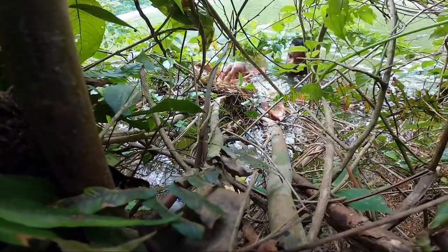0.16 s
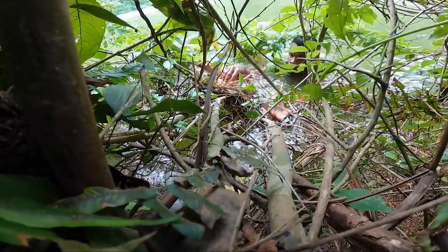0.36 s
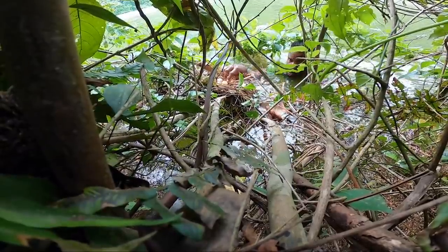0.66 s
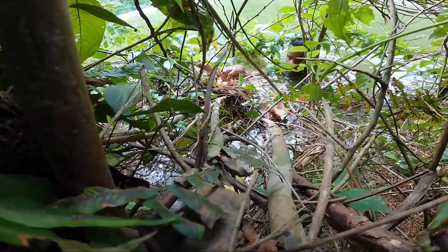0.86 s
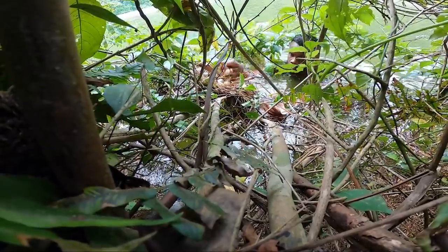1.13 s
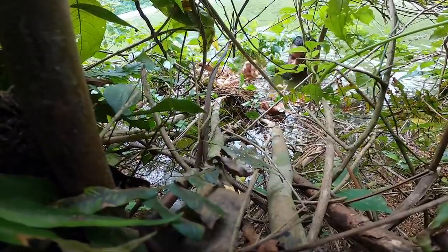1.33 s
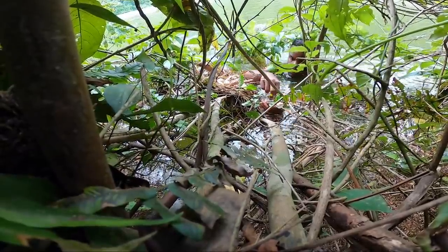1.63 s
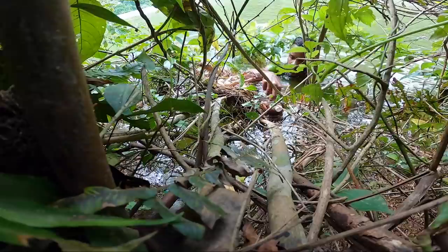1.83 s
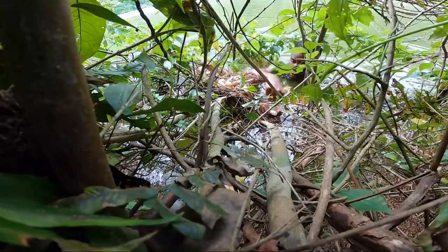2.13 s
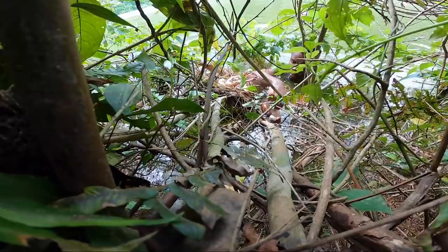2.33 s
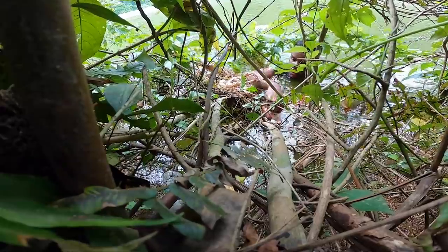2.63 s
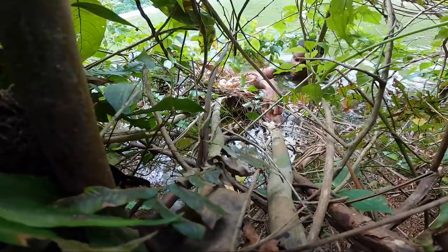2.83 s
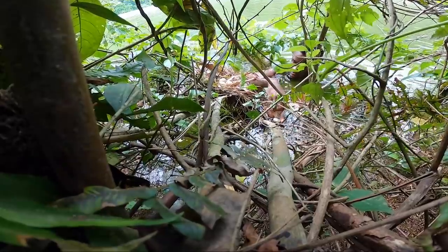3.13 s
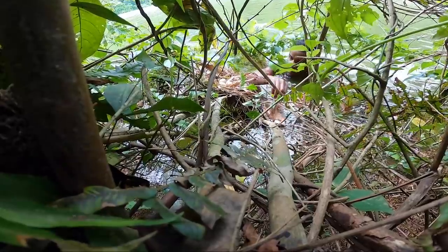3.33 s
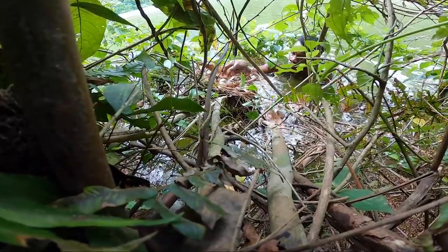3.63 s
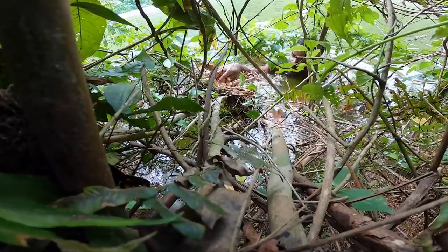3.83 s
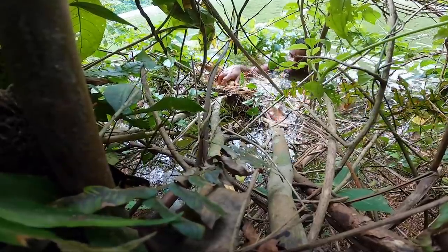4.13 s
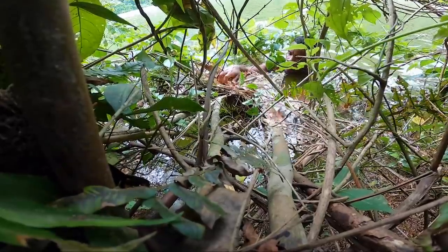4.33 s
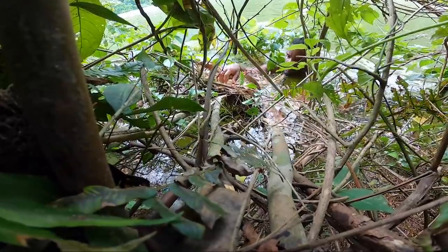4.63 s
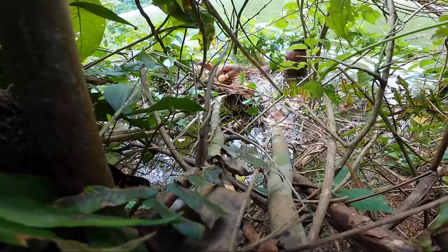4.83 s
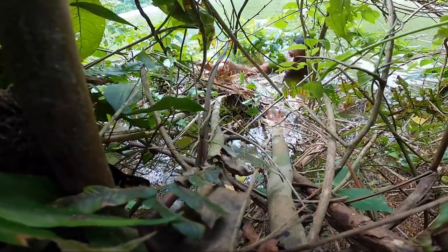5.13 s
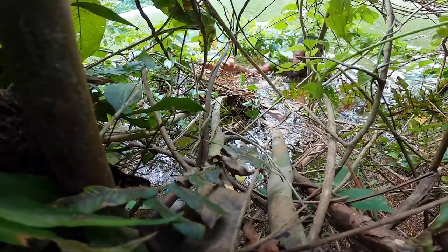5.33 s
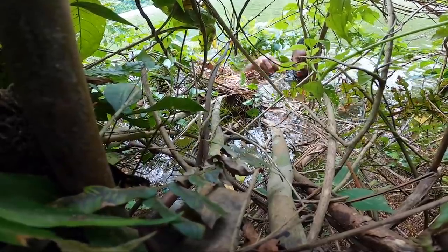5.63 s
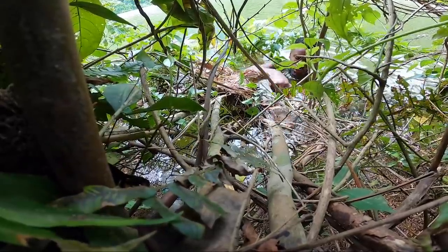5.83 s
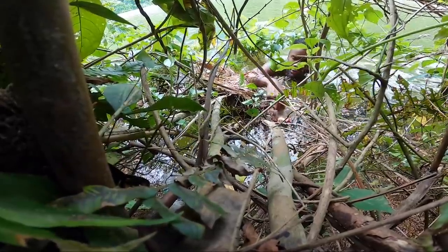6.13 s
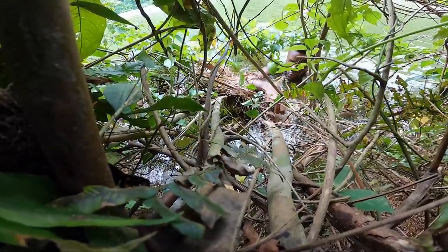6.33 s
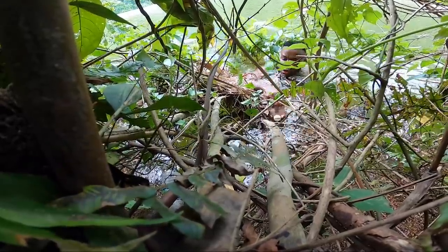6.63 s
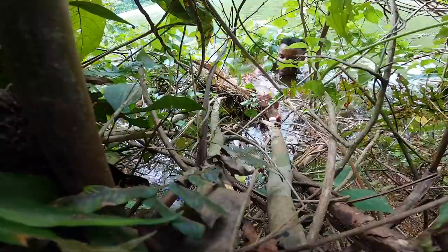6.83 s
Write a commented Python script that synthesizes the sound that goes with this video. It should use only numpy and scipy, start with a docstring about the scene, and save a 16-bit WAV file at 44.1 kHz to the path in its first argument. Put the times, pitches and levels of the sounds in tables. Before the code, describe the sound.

Twigs snap and leaves rustle as hands rummage in waterside brush, with hollow stem knocks, woody scuffs, and a few small bubbles over a faint low hum.

```python
"""In a pond, someone chest-deep works with both hands among the brush of the bank, a little to the right.
Twigs snap (short noise bursts that ring); a hollow stem is knocked (fading tones) and rubbed (tuned noise).
Leaves rustle and bark scuffs (crackling, coloured noise); the water gulps a few bubbles (gliding tones).
A low hum and light wind (low noise) lie beneath, with soft air, and swell when the brush is jolted.
Two close microphone ports pick it all up, the left one slightly later."""
import sys
import numpy as np
from scipy import signal
from scipy.io import wavfile

SR = 44100
rng = np.random.default_rng(int(sys.argv[2]) if len(sys.argv) > 2 else 0)


def to_wav(sig):
    """Store sig (one row per channel, or 1-D mono) as 16-bit WAV at the path in sys.argv[1].

    Samples outside -1..1 are clipped; the rate is SR.
    """
    pcm = np.clip(np.atleast_2d(sig), -1, 1) * 32767
    pcm = np.round(pcm).astype(np.int16)
    wavfile.write(sys.argv[1], SR, pcm.T)  # frames by channels


N = 307377   # length [samples]

# hands in the brush, levels before each layer's own trim: (time [s], leaf rustle [dB], scuffing [dB])
HANDS = [(0.0, -59, -56), (0.1, -56, -58), (0.23, -58, -59), (0.42, -56, -59), (0.58, -62.5, -60.5),
         (0.8, -64, -57), (0.93, -54.5, -57.5), (1.07, -58, -57), (1.5, -61, -66.5), (2.02, -63, -59),
         (2.07, -58.5, -53), (2.19, -50.5, -62), (2.31, -63, -56), (2.38, -62, -57), (2.42, -65.5, -60),
         (2.7, -59, -58), (2.74, -65, -48.5), (2.8, -63.5, -56.5), (2.95, -51.5, -42.5), (3.04, -60, -46),
         (3.07, -66, -77), (3.11, -58.5, -59), (3.24, -68.5, -59), (3.35, -60.5, -55), (3.49, -59, -49),
         (3.53, -65.5, -61), (3.8, -66.5, -64.5), (4.02, -52, -57.5), (4.12, -58.5, -57), (4.3, -50.5, -60),
         (4.53, -59.5, -61), (4.62, -56.5, -51), (4.88, -59.5, -60), (4.97, -53.5, -54),
         (5.15, -54.5, -54.5), (5.4, -61, -55), (5.71, -55, -52), (5.85, -58.5, -54), (6.0, -60.5, -53.5),
         (6.08, -57.5, -54), (6.22, -61.5, -56), (6.4, -60, -57.5), (6.54, -55, -40.5), (6.6, -60, -58),
         (6.66, -54.5, -49), (6.75, -53.5, -49.5), (6.97, -56.5, -54.5)]
# a hand drags along the stem: (time of the firmest grip [s], rubbing level there [dB], length [s])
DRAGS = [(0.154, -55, 0.12), (0.33, -52, 0.12), (0.45, -47.5, 0.16), (0.936, -49, 0.24),
         (1.254, -54.5, 0.1), (1.37, -60, 0.83), (1.65, -59.5, 0.69), (2.155, -45, 0.15),
         (2.335, -54.5, 0.53), (2.95, -44, 0.31), (3.155, -56, 0.32), (3.421, -40, 0.17),
         (4.276, -53, 0.047), (4.453, -55, 0.098), (4.587, -58, 0.18), (5.082, -62.5, 0.57),
         (5.571, -55, 0.5), (6.796, -53, 0.18)]
DRAG_FALL_DB = 11.5   # drop from the firmest grip to either end of a drag
RUB_REST_DB, DRAG_SCUFF_DB = -75, -5   # rubbing between drags; scuffing compared with the drag
# the brush is jolted and shakes the ports: (time [s], wind rumble peak [dB], hum peak [dB])
JOLTS = [(0.47, -63, -59), (0.9, -59, -53.5), (1.29, -58, -54.5), (1.8, -58, -73), (2.17, -58.5, -58),
         (2.29, -61, -55), (2.5, -54, -60), (2.721, -59, -54), (2.89, -50, -50.5), (2.97, -70, -65),
         (3.38, -50.5, -44.5), (3.951, -53, -47.5), (4.28, -61.5, -66), (4.6, -63, -55.5), (5.05, -56, -58),
         (5.4, -64, -51), (5.78, -63, -59), (6.02, -61, -52), (6.24, -62, -50.5), (6.58, -65, -76),
         (6.72, -75, -51.5), (6.9, -53, -53)]
JOLT_RISE_S = 0.059   # time for the last 20 dB of a rise

# colour of the wind rumble: (frequency [Hz], relative level [dB per Hz])
RUMBLE_COLOUR = [(15, -31), (25, -5), (113, -7.5), (130, -11), (170, -38), (290, -120)]
# colour of the hum: (frequency [Hz], relative level [dB per Hz])
HUM_COLOUR = [(110, -41), (135, -16.5), (160, 5.5), (200, -2), (260, -7), (340, -9), (420, -30)]
# colour of the air: (frequency [Hz], relative level [dB per Hz])
AIR_COLOUR = [(150, -13), (250, -10), (313, -28), (373, 4), (547, -4.5), (586, 3.5), (875, -25.5),
              (1200, 10.5), (1420, -10), (2800, -48)]
# colour of the leaves: (frequency [Hz], relative level [dB per Hz])
LEAF_COLOUR = [(1180, -26), (2000, -21), (2280, -8.5), (2860, -2), (3550, 6), (4050, 4.5), (5580, -9.5),
               (6200, -1.5), (9170, -9), (13200, -27.5), (16000, -36)]
# colour of the bark: (frequency [Hz], relative level [dB per Hz])
BARK_COLOUR = [(440, -52), (750, -12.5), (1400, -6.5), (1650, -7), (1810, -1), (1990, -12.5), (3000, -16),
               (4400, -40)]
# how alike the two ports are: (frequency [Hz], likeness [1 = the same, 0 = unrelated])
LIKENESS = [(30, 0.82), (130, 0.4), (300, 0.65), (700, 0.86), (1500, 0.76), (4000, 1), (12000, 0.039)]

# ways the stem's wall rings: (frequency at the middle grip [Hz], width of each filter pole [Hz],
# relative level [dB])
STEM_WALL = [(1080, 150, -0.5), (1380, 140, 2), (1640, 180, 6), (2445, 110, 11), (3400, 200, 7)]
# air column of the stem as the grip moves along it: (time [s], frequency [Hz])
STEM_PITCH = [(0, 491.4), (1.7, 495.3), (2.1, 440.3), (2.75, 420.7), (3.25, 451.6), (3.55, 535), (4.6, 553),
              (6.97, 539.5)]
# knocks on the hollow stem: (time [s], peak [dB], air column [Hz], time to fade 60 dB [s, at least 0.01])
KNOCKS = [(0.033, -45, 487, 0.1), (0.141, -32.5, 587, 0.016), (0.277, -34.5, 490, 0.047),
          (0.323, -40, 506, 0.035), (0.341, -34.5, 485, 0.054), (0.407, -37, 479, 0.088),
          (0.434, -32, 500, 0.027), (0.447, -36, 334, 0.024), (0.461, -36, 514, 0.03),
          (0.504, -44, 513, 0.056), (0.778, -36.5, 507, 0.04), (1.385, -47, 501, 0.13),
          (1.405, -47.5, 490, 0.15), (1.762, -40.5, 494, 0.0096), (1.809, -45, 436, 0.15),
          (2.096, -38, 442, 0.2), (2.127, -30.5, 452, 0.099), (2.15, -31.5, 490, 0.037),
          (2.338, -29.5, 417, 0.016), (2.358, -37.5, 429, 0.07), (2.52, -23.5, 544, 0.0097),
          (2.736, -42.5, 410, 0.24), (2.816, -36, 439, 0.21), (2.855, -32, 442, 0.063),
          (2.88, -21, 460, 0.069), (2.902, -22, 457, 0.059), (2.942, -38, 436, 0.044),
          (2.962, -25.5, 442, 0.034), (2.992, -36.5, 433, 0.056), (3.178, -40, 456, 0.066),
          (3.203, -36.5, 460, 0.052), (3.272, -36, 460, 0.033), (3.346, -30.5, 506, 0.15),
          (3.359, -25.5, 452, 0.05), (3.383, -15.5, 486, 0.047), (3.436, -35, 468, 0.093),
          (3.46, -39.5, 532, 0.34), (3.497, -24, 538, 0.066), (3.553, -35.5, 536, 0.065),
          (4.074, -45.5, 542, 0.064), (6.789, -29.5, 592, 0.023)]
# snapping twigs: (time [s], peak [dB], ring [Hz], body compared with ring [dB],
# edge compared with ring [dB], time to fade 60 dB [ms, held between 3 and 50])
SNAPS = [(0.026, -37, 2090, -12, -25, 40), (0.084, -32, 3700, -16, -4, 29),
         (0.1415, -15.5, 3060, 1, -11, 9.6), (0.273, -26, 1560, -3, -3, 18),
         (0.2827, -27.5, 1530, 2, -12, 23), (0.3295, -25, 1560, 16, -8, 20),
         (0.4, -30.5, 1080, 6.5, -20, 40), (0.41, -40, 1520, -5, -25, 25), (0.429, -29, 2780, 11, -17, 48),
         (0.441, -35, 1470, -11, -25, 33), (0.742, -37.5, 2570, 8, -7, 33),
         (0.7755, -25, 2750, 1, -7.5, 17), (1.261, -27, 3500, -14, 10, 33),
         (1.2695, -7, 3400, -7, -1.5, 7.6), (1.2736, -6, 4400, -49, 1, 9), (1.305, -37, 3160, -20, 5, 50),
         (1.497, -36.5, 6160, -14, -4, 28), (1.559, -36.5, 4050, 3, -5, 60),
         (1.5777, -29.5, 1550, -26, -8.5, 40), (1.76, -37, 4430, 5, -10, 20),
         (1.8106, -25, 1820, 12, -14, 14), (1.83, -32.5, 1770, 3, -1.5, 43),
         (1.87, -40, 1460, -19, -25, 45), (1.929, -26.5, 3200, 11, -25, 15),
         (2.0035, -19.5, 4500, -24, 0.5, 12), (2.045, -31.5, 4000, -14, -1, 30),
         (2.091, -25.5, 1800, -7, -17, 25), (2.0939, -13, 3980, -14, -22, 7.6),
         (2.0957, -17.5, 1880, -22, -30, 15), (2.1263, -14.5, 3400, -2.5, -26, 11),
         (2.1279, -8.5, 1095, 14, -30, 9.6), (2.153, -14.5, 3600, 7, -10, 11),
         (2.168, -20.5, 1470, 20, 11, 36), (2.176, -11, 3650, -8, 7, 11), (2.188, -21, 1870, 12, 8, 28),
         (2.248, -27, 3500, 0, -2, 27), (2.257, -36, 1220, -14, -23, 20), (2.2624, -19, 4350, -21, 0.5, 16),
         (2.273, -25, 3450, 7, -2, 20), (2.3383, -23, 2100, -3, -41, 17.4),
         (2.356, -35, 1500, -10, -20, 36), (2.377, -28, 1420, 9, 0.5, 40),
         (2.5193, -6.5, 3290, 11.5, -1, 8.7), (2.532, -20, 4000, -22, -11, 19),
         (2.589, -30, 3930, -20, 1, 16), (2.642, -32.5, 3740, -29, -10, 15),
         (2.717, -24, 3830, -28, 0.5, 18), (2.731, -33, 1560, 5, -5, 43), (2.813, -37, 1360, -12, -26, 28),
         (2.852, -32.5, 1380, -2, -12, 51), (2.877, -26, 1360, 0, -8, 60), (2.9405, -26, 1590, 3, -25, 27),
         (2.962, -33.5, 1470, -8, -28, 37), (2.978, -31, 1540, -16, -25, 40),
         (3.006, -31.5, 1580, -3, -32, 40), (3.0266, -25.5, 1560, 7, -33, 39),
         (3.1174, -26, 1566, -7, -35, 23), (3.176, -35, 1400, 5, -12, 36), (3.189, -38, 3470, -17, -9, 40),
         (3.1984, -24.5, 3730, -5, -30, 17), (3.271, -26.5, 1430, 12, -26, 31),
         (3.3274, -24.5, 1480, -18, -29, 22), (3.3472, -31, 1420, 0, -28, 71),
         (3.382, -19, 4340, -1, -15, 16.5), (3.442, -38.5, 1570, -6, -25, 40),
         (3.4699, -24, 3030, 1, -1, 25.5), (3.481, -22.5, 4350, -4.5, -10, 13),
         (3.489, -32.5, 1560, -9, -20, 40), (3.867, -27, 1660, 1, 0, 19), (3.9355, -23, 3430, -7, -12, 8),
         (3.9365, -6.5, 4050, -15, -1.5, 4.6), (3.9367, -24, 1900, 3, -8, 19),
         (4.4293, -18.5, 3530, -6.5, -13, 14), (4.6544, -33, 2060, -7, -10, 32),
         (4.7401, -20, 3790, -48.5, -32, 19), (4.7427, -23, 1870, -38, -13, 20),
         (4.769, -37, 4030, -28, -21, 40), (4.8286, -22.5, 3400, -14, -10, 17),
         (4.9766, -27, 3840, -3, -7, 20), (5.024, -31.5, 2410, 13, -21, 40),
         (5.223, -28.5, 3150, 11, 4.5, 63), (5.45, -31.5, 1420, 9, -8, 27),
         (5.506, -28.5, 1130, 3.5, -38, 59), (5.533, -32, 3030, -24, -19, 53),
         (5.614, -33, 1300, 2, -24, 22), (5.6854, -19.5, 3800, -28, -13, 12),
         (5.732, -32, 3130, 4, -26, 37), (5.759, -31, 2450, 2, -19, 31),
         (5.7756, -29.5, 3320, -26, -1.5, 27), (5.787, -34.5, 1506, 13, -20, 37),
         (5.862, -36, 1860, -2, -18, 37), (6.036, -37.5, 1500, -20, -16, 44),
         (6.0489, -25, 1540, 4, -3, 42), (6.056, -29.5, 1490, -10, -15, 44),
         (6.0715, -24.5, 3440, -5, -4, 28), (6.114, -35.5, 1190, -9, -9, 34),
         (6.2676, -26.5, 1380, -33, -17, 37), (6.282, -22.5, 2920, -32, -14, 13),
         (6.351, -12, 3850, -17, -4.5, 11.4), (6.374, -34.5, 1810, -2, -25, 53),
         (6.505, -29.5, 1880, -12, -3, 35), (6.515, -24, 1620, 5, -8, 25), (6.529, -24, 3880, 0, -11, 18),
         (6.531, -20, 3120, -11, -26, 16), (6.5365, -20, 1840, -2, -24, 22),
         (6.539, -22, 1030, -7, -25, 25), (6.544, -21.5, 3020, -12, -16, 20),
         (6.5532, -16.5, 3270, -32, -28, 7.9), (6.554, -20.5, 1990, -10, -25, 32),
         (6.5588, -30, 1070, 6, -22, 27), (6.5645, -25, 3550, -5, -13, 16), (6.639, -32, 1920, -9, -25, 59),
         (6.6652, -29, 1590, -17, -23, 54), (6.684, -19.5, 1540, -5, -13, 17),
         (6.705, -39, 1010, 0, -18, 40), (6.7149, -30, 1950, 8, -22, 40), (6.721, -25.5, 1420, 7, -19, 21),
         (6.7247, -14, 1640, 0, -14, 13), (6.75, -42, 3650, -20, -21, 30), (6.771, -20, 4670, -24, -30, 15),
         (6.789, -21.5, 1080, 4, -4, 26), (6.7918, -11.5, 2750, 16, -7, 11),
         (6.793, -19, 2720, -9, -20, 17), (6.8359, -20, 3000, -12, 9, 19),
         (6.858, -12.5, 4200, -18, -5, 9.2), (6.8709, -4, 4470, -9, -1, 4.3),
         (6.91, -31, 2380, 18, -28, 38), (6.931, -32.5, 2460, -9, -22, 40)]
# bubbles and low gulps: (time [s], length [s], first pitch [Hz], last pitch [Hz],
# lateness of the pitch change [1 = steady, more = later], level before the swell [dB])
BUBBLES = [(0.032, 0.018, 1260, 3300, 2.1, -42), (5.242, 0.091, 630, 934, 1.55, -49.5),
           (5.321, 0.03, 895, 2090, 0.84, -49.5), (5.616, 0.037, 410, 456, 1.4, -52.5),
           (5.66, 0.1, 490, 796, 1.66, -54.5), (6.05, 0.019, 440, 500, 1.5, -46),
           (5.361, 0.038, 714, 1330, 1, -48.5), (5.394, 0.02, 1316, 1410, 1.1, -46),
           (5.508, 0.058, 603, 580, 1.5, -31), (5.51, 0.057, 850, 1570, 6.3, -46),
           (5.674, 0.024, 606, 1510, 1.6, -48), (5.704, 0.018, 1504, 1600, 1.7, -37),
           (5.74, 0.0073, 820, 1010, 1.4, -40), (5.362, 0.043, 550, 543, 1.5, -47),
           (5.506, 0.015, 760, 980, 0.6, -29), (5.029, 0.04, 556, 653, 0.98, -48),
           (6.489, 0.016, 967, 1190, 2.6, -37), (6.572, 0.024, 720, 1340, 1.55, -45.5),
           (6.725, 0.072, 414, 746, 3.3, -44.5), (6.758, 0.023, 1210, 1410, 3.2, -38),
           (6.801, 0.032, 808, 1740, 1.1, -44), (5.715, 0.035, 1500, 2120, 1.2, -47),
           (6.875, 0.08, 159, 171, 2, -42), (3.375, 0.025, 189, 220, 1.5, -47),
           (3.941, 0.02, 210, 230, 1.5, -50), (3.98, 0.056, 169, 180, 1.5, -49),
           (4.002, 0.06, 255, 270, 1.5, -52), (5.84, 0.044, 165, 178, 1.8, -50),
           (6.215, 0.025, 178, 191, 1.5, -45)]

# left compared with right: hands, wood, water and air; wind and hum
LEFT_DB, WIND_LEFT_DB = -1.5, -2.5


def from_db(db):
    """Turn decibels into a gain."""
    return 10 ** (np.asarray(db) / 20)


def power_sum(*levels_db):
    """Level of several unrelated sounds together, in dB."""
    return 10 * np.log10(sum(from_db(db) ** 2 for db in levels_db))


def rms_one(x):
    """Scale to an average strength (rms) of 1."""
    return x / np.sqrt(np.mean(x ** 2) + 1e-20)


def peak_one(x):
    """Scale to a peak of 1."""
    return x / np.abs(x).max()


def in_time(rows):
    """Turn each column after the time into a curve, one value per sample."""
    s, *columns = np.transpose(rows)
    return [np.interp(np.arange(N) / SR, s, column) for column in columns]


def at_hz(points, hz):
    """Read a table at a frequency, along a logarithmic axis."""
    table_hz, values = np.transpose(points)
    return np.interp(np.log(hz), np.log(table_hz), values)


def panned(x, left_db):
    """Make the left port louder than the right by left_db, half on each side."""
    return x * from_db([[left_db / 2], [-left_db / 2]])


def add(out, s, sound, left_db):
    """Place a sound at time s, panned."""
    i = round(s * SR)
    out[:, i:i + sound.shape[-1]] += panned(sound[..., :N - i], left_db)


def drift(rate_hz):
    """Slow random wandering of strength 1: noise smoothed by a low-pass at rate_hz."""
    step = 40   # worked out at every 40th sample, then joined up
    r = np.exp(-2 * np.pi * step * rate_hz / SR)
    noise = rng.standard_normal(N // step + 2002)
    slow = signal.lfilter([1], [1, -2 * r, r * r], noise)[2000:]   # skip the start-up
    return np.interp(np.arange(N) / step, np.arange(len(slow)), rms_one(slow))


def band(x, low_hz, high_hz):
    """Keep only the frequencies between low_hz and high_hz, with gentle edges."""
    return signal.sosfilt(signal.butter(2, [low_hz, high_hz], "band", fs=SR, output="sos"), x)


def resonance(x, hz, width_hz):
    """Ring like one tuned object: a two-pole filter with a gain of about 1 at its pitch."""
    r = np.exp(-np.pi * width_hz / SR)
    turn = 2 * np.pi * hz / SR
    return signal.lfilter([(1 - r * r) / 2, 0, (r * r - 1) / 2], [1, -2 * r * np.cos(turn), r * r], x)


def gliding(loudness, hz, pole_width_hz):
    """Noise in a resonance whose centre moves: slow noise carried up to hz; rms 1."""
    r = np.exp(-np.pi * pole_width_hz / SR)
    slow = signal.lfilter([1], [1, -2 * r, r * r], loudness * rng.standard_normal((2, N)))
    phase = 2 * np.pi * np.cumsum(hz) / SR
    return rms_one(slow[0] * np.cos(phase) + slow[1] * np.sin(phase))


def coloured(grit, spectrum, patchy_db, rate_hz):
    """Stereo noise in third-octave bands, each with its own level and flicker; grit is its loudness; rms 1."""
    first_hz, last_hz = max(spectrum[0][0], 20), min(spectrum[-1][0], 17000)
    edges = first_hz * 2 ** np.arange(0, np.log2(last_hz / first_hz), 1 / 3)
    together = drift(rate_hz)   # flicker shared by all bands
    white = grit * rng.standard_normal((2, 2, N))
    out = 0
    for k, (low, high) in enumerate(zip(edges, edges[1:])):
        mid, side = band(white[k % 2], low, high)   # neighbouring bands use different noise
        hz = np.sqrt(low * high)
        alike = np.clip(at_hz(LIKENESS, hz), -1, 1)
        gain = from_db(at_hz(spectrum, hz) + patchy_db * (together + drift(rate_hz)))
        out = out + gain * (np.sqrt(1 + alike) * mid + np.sqrt(1 - alike) * side * [[1], [-1]])
    return rms_one(out)


def uneven_sizes(spread_db):
    """A random size for every sample: mostly small, a few much larger."""
    return from_db(spread_db * np.minimum(rng.exponential(1, N), 4))


def crackle(per_s, spread_db, fade_s, smooth):
    """Loudness of many tiny contacts of uneven size, each dying fast, over a smooth share."""
    contacts = uneven_sizes(spread_db) * (rng.random(N) < per_s / SR)
    return smooth + signal.lfilter([1], [1, -np.exp(-1 / (fade_s * SR))], contacts)


def shaken(rest_db, peaks_db, t60_s):
    """A resting level that each jolt lifts quickly and that then dies back, in dB."""
    t = np.arange(0, N / SR, 0.002)
    lifts = []
    for (s, *_), peak_db in zip(JOLTS, peaks_db):
        rise = 20 * (s - t) / JOLT_RISE_S
        fall = 60 * (t - s) / t60_s
        lifts.append(peak_db - np.minimum(np.maximum(rise, fall), 90))
    return in_time(np.transpose([t, power_sum(rest_db, *lifts)]))[0]


def wind():
    """Light wind: low rumbling noise that swells as jolts of the brush shake the ports."""
    _, rumble_db, _ = np.transpose(JOLTS)
    level_db = shaken(-68, rumble_db, t60_s=0.71)
    return from_db(level_db) * coloured(1, RUMBLE_COLOUR, patchy_db=1.0, rate_hz=14.0)


def hum():
    """Low hum: a narrow heap of noise that swells with the same jolts."""
    _, _, hum_db = np.transpose(JOLTS)
    level_db = shaken(-61, hum_db, t60_s=0.59)
    return from_db(level_db) * coloured(1, HUM_COLOUR, patchy_db=0.5, rate_hz=1.95)


def air():
    """Soft air: noise with a slight flicker and no swells."""
    return from_db(-62) * coloured(1, AIR_COLOUR, patchy_db=0.8, rate_hz=8.7)


def leaves(leaf_db):
    """Leaves rub in many tiny contacts, heard as crackling noise with a fine hiss on top."""
    rustle = coloured(crackle(82, 3.4, 0.0036, 2.5), LEAF_COLOUR, patchy_db=2.0, rate_hz=6.1)
    fine_db = -78.5 + 1.05 * (leaf_db - leaf_db.mean())   # brisk rustling is brighter
    fine = rms_one(band(crackle(67, 4.5, 0.006, 1.1) * rng.standard_normal((2, N)), 8500, 14000))
    return from_db(leaf_db + 3.5) * rustle + from_db(fine_db) * fine


def bark(scuff_db):
    """Scuffed bark: steady rubbing heard as dull noise with a patchy flicker."""
    return from_db(scuff_db - 0.5) * coloured(1, BARK_COLOUR, patchy_db=3.5, rate_hz=10.4)


def flecks(per_s, low_hz, high_hz, cycles, spread_db):
    """Droplets and leaf ticks: random clicks, each ringing a few cycles at one of 14 pitches; rms 1."""
    sizes = uneven_sizes(spread_db) * rng.choice([-1, 1], N)
    clicks = sizes * (rng.random(N) < per_s * from_db(4 * drift(8)) / SR)
    dealt = rng.integers(0, 14, N)   # which pitch each click gets
    pitches = np.geomspace(low_hz, high_hz, 14)
    return rms_one(sum(resonance(clicks * (dealt == k), hz, hz / cycles) for k, hz in enumerate(pitches)))


def scuffs():
    """Fingers and twigs scuff the stem's wall: uneven contacts ring it at pitches that wander; rms 1."""
    contacts = crackle(150, 6.5, 0.0018, 0.39)
    out = 0
    for hz, pole_width_hz, db in STEM_WALL:
        moving_hz = hz * (1 + 0.09 * drift(7.0))   # the grip shifts each pitch by about 9 percent
        out = out + from_db(db) * gliding(contacts, moving_hz, pole_width_hz)
    return rms_one(out)


def drags():
    """Grip on the stem swells and eases evenly around each drag; a level in dB for every sample."""
    t = np.arange(0, N / SR, 0.002)
    swells = [db - DRAG_FALL_DB * np.minimum(2 * abs(t - s) / length, 8) for s, db, length in DRAGS]
    return in_time(np.transpose([t, power_sum(*swells)]))[0]


def stem(rub_db):
    """The air column of a hollow stem: rubbing keeps it murmuring, soft knocks set it ringing."""
    grit = crackle(60, 0.33, 0.0049, 0.38)
    murmur = gliding(grit, in_time(STEM_PITCH)[0], pole_width_hz=196)
    out = panned(from_db(rub_db) * murmur, LEFT_DB)
    t = np.arange(SR // 8) / SR
    for s, db, hz, t60_s in KNOCKS:
        swell = (1 - np.exp(-(t / 0.003) ** 2)) * from_db(-60 * t / max(t60_s, 0.01))
        add(out, s, from_db(db) * np.sin(2 * np.pi * hz * t) * swell / swell.max(), LEFT_DB)
    return out


def twigs():
    """Fibres part in a burst of uneven splinters that dies within milliseconds and rings the wood briefly."""
    out, t = np.zeros((2, N)), np.arange(SR // 24) / SR
    opposite = np.array([[1], [-1]])   # one sign for each port
    for s, db, hz, body_db, edge_db, t60_ms in SNAPS:
        noise, other, size = rng.standard_normal((3, len(t)))
        t60_s = np.clip(t60_ms, 3, 50) / 1000
        shape = from_db(-60 * t / t60_s) * (1 - np.exp(-(t / 0.00027) ** 2))
        shape *= 1 + 0.5 * np.exp(-t / 0.0003)   # the first crack stands out
        burst = noise * shape * from_db(2.95 * size)
        ring = peak_one(resonance(resonance(burst, hz, hz / 7.5), hz, hz / 0.95))
        body = peak_one(band(band(burst, 1060, 3950), 440, 8300))
        middle = peak_one(band(band(burst, 2770, 3890), 760, 9200))
        # the sharpest part reaches the two ports by unlike paths, the right one stronger
        sharp = band(burst + 63.0 * other * shape * opposite, 5320, 8660)
        edge = peak_one(sharp * from_db([[-3.5], [0]]))
        # the finest splinters go on longer, and count for more in quiet snaps
        fine = peak_one(band((other + 0.81 * size * opposite) * shape ** 0.22, 6000, 14000))
        fine_db = edge_db - 15.0 - 0.12 * (db + 19)
        sound = ring + from_db(body_db) * body + from_db(-8.0) * middle
        sound = sound + from_db(edge_db) * edge + from_db(fine_db) * fine
        add(out, s, from_db(db) * peak_one(sound), LEFT_DB)
    return out


def water():
    """Bubbles and gulps ring as pure tones; a bubble's pitch mostly climbs as it nears the surface."""
    out = np.zeros((2, N))
    waver_db = 1.5 * drift(60)   # the surface around it heaves
    for s, length, first_hz, last_hz, late, db in BUBBLES:
        u = np.linspace(0, 1, round(length * SR))   # 0 at the start of the bubble, 1 at its end
        hz = first_hz + (last_hz - first_hz) * u ** late
        ratio = first_hz / last_hz
        rise = np.minimum(u / (0.028 + 0.2 * abs(1 - ratio)), 1)
        fade_db = 16 * ratio ** 4.1 * u   # a steady pitch fades by 16 dB, climbing ones stay strong
        swell = rise * (1 - u ** 7.4) * from_db(waver_db[round(s * SR):][:len(u)] - fade_db)
        add(out, s, from_db(db) * swell * np.sin(2 * np.pi * np.cumsum(hz) / SR), LEFT_DB)
    return out


def thicket(x, t60_s, dull_hz):
    """Trunks and leaves scatter a short dull tail, another one into each port."""
    t = np.arange(SR // 6) / SR
    tail = rng.standard_normal((2, len(t))) * from_db(-60 * t / t60_s) * np.minimum(t / 0.00078, 1)
    tail = band(tail, 540, dull_hz)
    tail /= np.sqrt(np.sum(tail ** 2, axis=1, keepdims=True))
    return signal.fftconvolve(x, tail, axes=1)[:, :N]


def scene():
    """Hands, wood and water close by, over air, hum and wind."""
    leaf_db, hand_scuff_db = in_time(HANDS)
    drag_db = drags()
    scuff_db = power_sum(hand_scuff_db, drag_db + DRAG_SCUFF_DB)
    rub_db = power_sum(RUB_REST_DB, drag_db)
    far = panned(wind() + hum(), WIND_LEFT_DB)
    around = panned(air() + leaves(leaf_db) + bark(scuff_db), LEFT_DB)
    ticks = from_db(leaf_db - 2.0) * flecks(500, 1343, 6310, cycles=14.5, spread_db=5.0)
    wall = from_db(scuff_db - 8.5) * scuffs()
    near = ticks + wall + stem(rub_db) + twigs() + water()
    near = near + from_db(-9.5) * thicket(near, t60_s=0.053, dull_hz=10600)
    return near + around + far


def record(dry):
    """Sound reaches the left port two samples later; a steep filter cuts the top."""
    lag = 2
    left = np.concatenate([np.zeros(lag), dry[0, :-lag]])
    top_cut = signal.cheby2(12, 70, 16200, fs=SR, output="sos")   # 70 dB down from 16200 Hz up
    return signal.sosfilt(top_cut, np.stack([left, dry[1]]))


dry = scene()
out = record(dry)
to_wav(out)
```